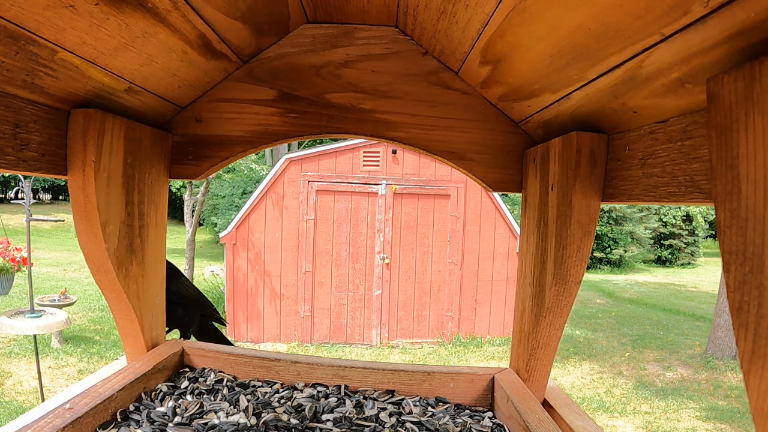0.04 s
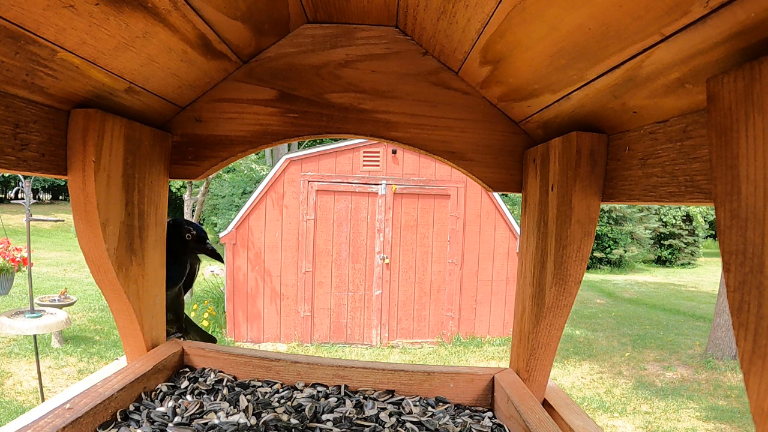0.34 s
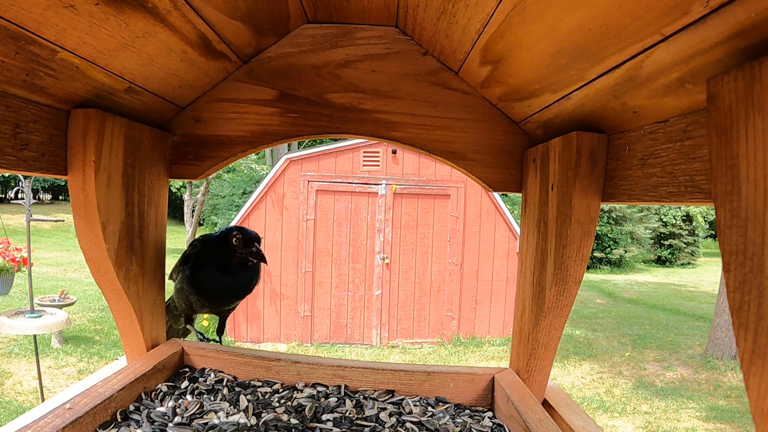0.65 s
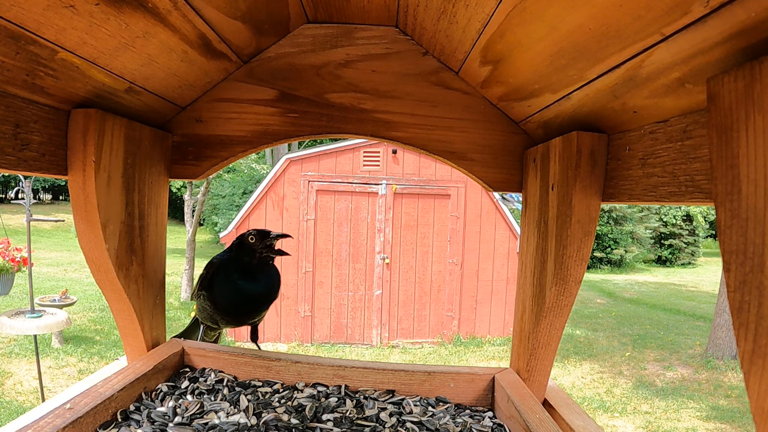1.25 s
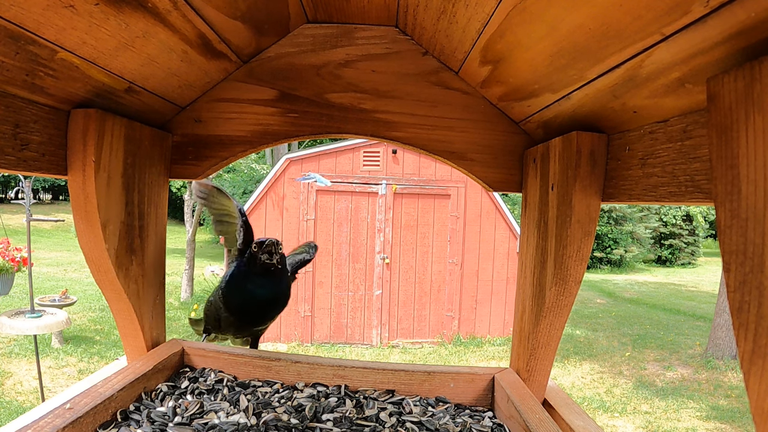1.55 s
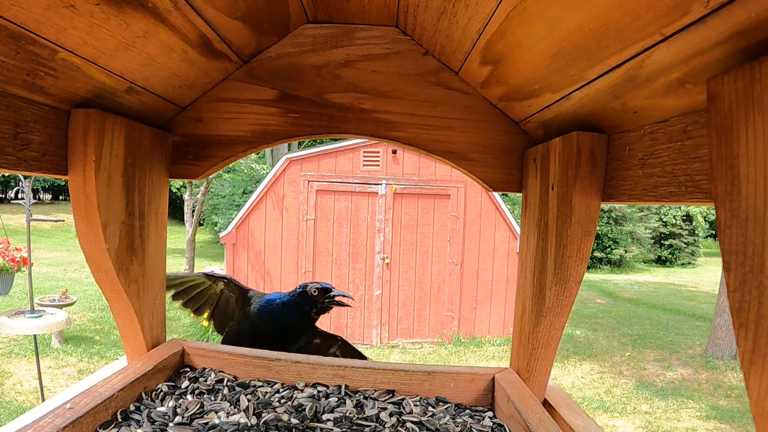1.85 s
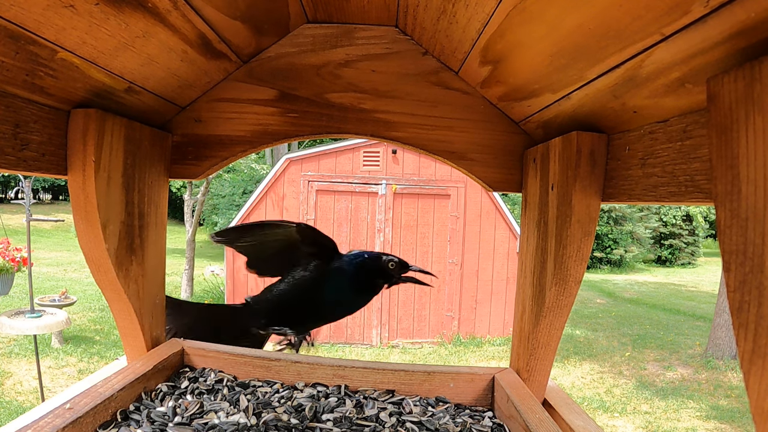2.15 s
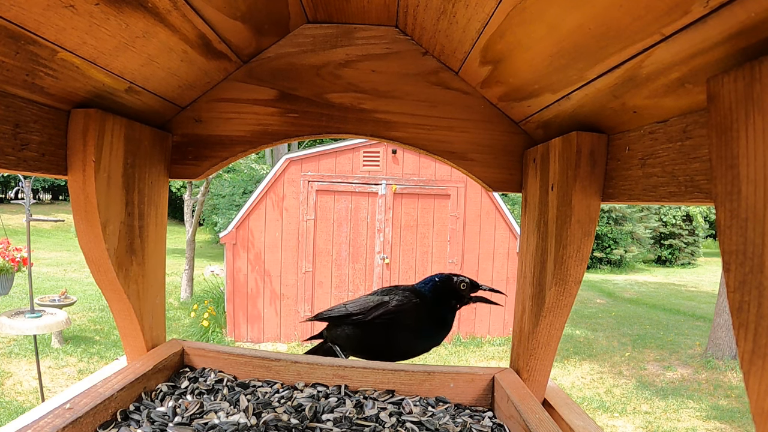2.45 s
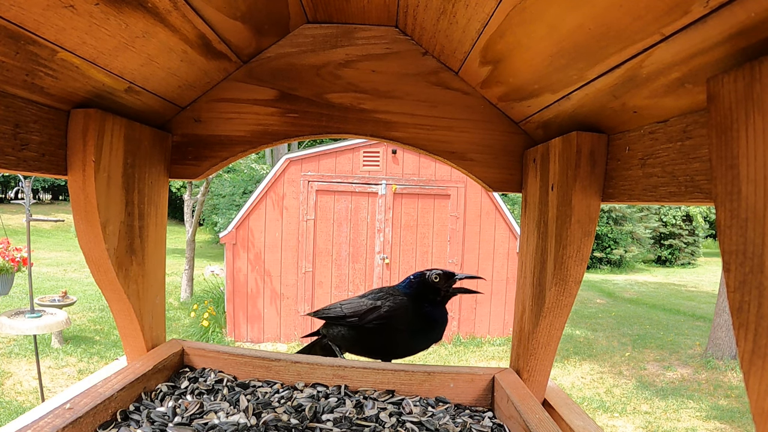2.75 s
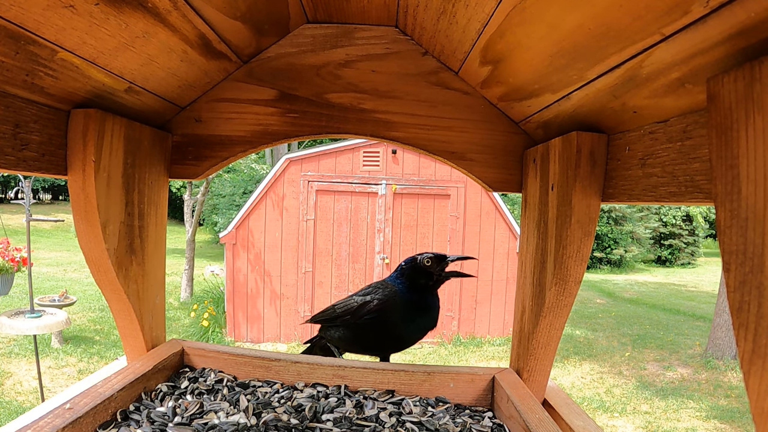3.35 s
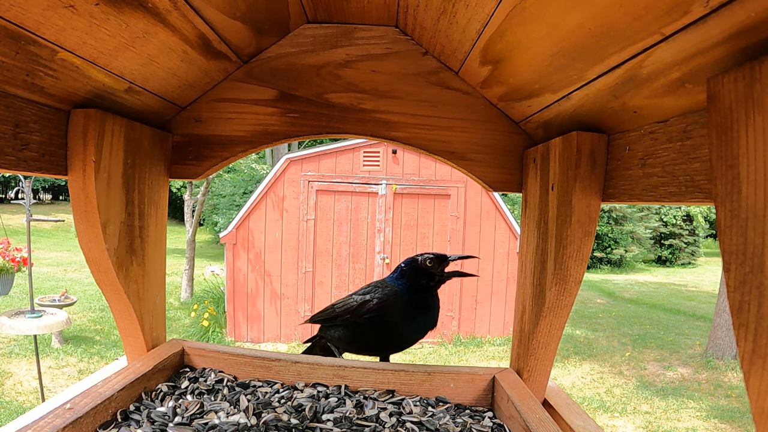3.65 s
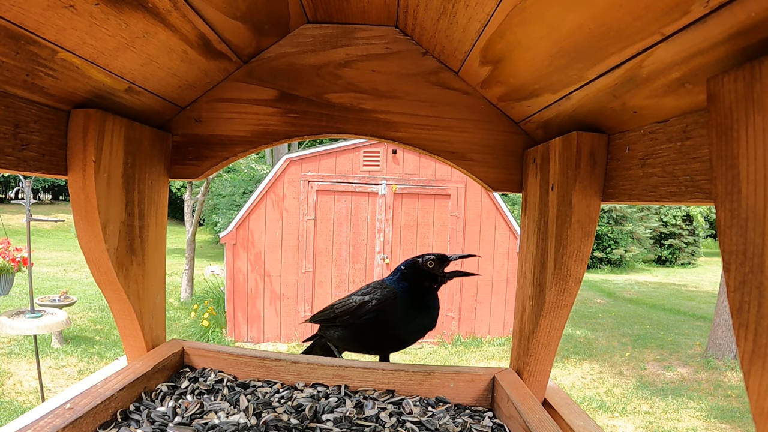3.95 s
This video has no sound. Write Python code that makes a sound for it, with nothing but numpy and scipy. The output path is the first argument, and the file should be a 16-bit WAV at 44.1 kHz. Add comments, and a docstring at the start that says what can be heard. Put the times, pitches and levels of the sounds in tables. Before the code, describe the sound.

Bird claws tap and scratch on wood close by, with rustling wings and faint wind.

```python
"""A bird hops along a small roofed wooden feeder, flaps across its rim and settles, close by.
Its claws catch and slip on the wood, so they tick and scratch while the boards knock and ring.
Its feathers rustle and swish over the wood, and moving air bumps the microphone.
Behind it a far engine drones, probably a mower, and other birds call faintly across the garden."""
import sys
import numpy as np
from scipy import signal
from scipy.fft import next_fast_len
from scipy.io import wavfile
from scipy.ndimage import uniform_filter1d

SR = 44100
rng = np.random.default_rng(int(sys.argv[2]) if len(sys.argv) > 2 else 0)


def transcribe(signal):
    """Save signal, clipped to [-1, 1], as a 16-bit WAV file at the path in sys.argv[1]."""
    frames = np.atleast_2d(signal).T
    limited = np.clip(frames, -1, 1)
    pcm = np.round(limited * 32767).astype(np.int16)
    wavfile.write(sys.argv[1], SR, pcm)


N = 176400
T = np.arange(N) / SR

# tone colours: how strong each frequency is (frequency [Hz], relative level [dB])
HUSH_COLOUR = [(20,-18),(200,10),(700,1),(1100,0.5),(2400,-6.5),(4800,-10.5),(7200,-17.5),(9000,-27),(12000,-36.5),(15500,-64)]  # outdoor air
RASP_COLOUR = [(5000,-35),(7500,0),(9500,-8),(13000,-9),(14500,-30)]  # a passing bird's rasp
WIND_COLOUR = [(10,1),(40,6),(90,-1),(140,-6.5),(210,-16.5),(320,-28.5),(700,-41.5),(2000,-86)]  # wind on the microphone
FEATHER_COLOUR = [(200,-16),(380,3),(600,3.5),(1200,0.5),(2700,-22.5),(5200,-23),(9000,-22.5),(13000,-34),(15500,-48)]  # feathers brushing wood
TICK_COLOUR = [(500,-24),(2000,-16),(3200,-2.5),(5200,-2.5),(7500,-5),(10000,-21),(12500,-19.5),(15500,-40)]  # a claw's bright tick
RAP_COLOUR = [(200,-33),(500,1),(1100,4.5),(1600,-1),(2200,-6.5),(2900,-12),(5000,-30),(16000,-57)]  # the duller rap on the rim

# the far engine's speed and loudness (time [s], firing rate [Hz], relative level [dB])
ENGINE_RUN = [(0,50.3,-36.5),(.8,49.96,-32.5),(1.15,49.26,-29),(1.42,46.28,-42.5),(1.7,47.47,-39),(2.05,50.2,-31),(2.5,50.74,-33.5),(2.75,51,-29.5),(3.05,53.1,-31.5),(3.4,53.9,-30.5),(4,52.57,-30.5)]
# the tones in its drone (multiple of the firing rate, relative level [dB])
ENGINE_TONES = [(1,-5.5),(2,-1.5),(3,-23)]
# far birds' whistles (time [s], relative level [dB])
WHISTLES = [(2.858,-60),(3.146,-60),(3.47,-57),(3.755,-57)]
# each whistle's steep drop and low tail (time into the note [s], pitch [Hz])
WHISTLE_PITCH = [(0,4800),(.046,3400),(.065,2350),(.125,2250)]
# a passing bird's call (time [s], length [s], relative level [dB], start pitch [Hz], end pitch [Hz])
PASSING_CALLS = [(1.064,.058,-49,6900,6350)]
# gusts on the microphone (time [s], relative level [dB])
GUSTS = [(0,-23.5),(.14,-43.5),(.45,-36.5),(.6,-24.5),(.74,-33),(.88,-27),(1.15,-35),(1.31,-26.5),(1.42,-38.5),(1.72,-39.5),(1.93,-31.5),(2.08,-35.5),(2.55,-33.5),(2.7,-44.5),(4,-54.5)]
# low bumps of air and the swaying feeder (time [s], relative level [dB], pitch [Hz], length [s])
BUMPS = [(.002,-24,96.7,0.042),(.555,-18,62.5,0.045),(.632,-21.5,92,0.058),(0.756,-25,66.6,0.047),(0.835,-18.5,69.6,0.05),(0.98,-14.5,140,0.01),(1.033,-15,71.4,0.032),(1.257,-18.5,102,0.02),(1.295,-24.5,129,.05),(2.519,-23,49,0.068)]
# the notes the boards ring at (pitch [Hz], relative level [dB], time for a knock to fade by 60 dB [s])
BOARD_NOTES = [(186.9,-5.5,0.3),(230.5,-15.5,0.37),(290,-10,0.61),(345,-0.5,0.23),(401,-0.5,0.14),(428,1,0.051),(533,-5,0.088),(575.6,-6.5,0.089),(678,-10.5,0.087),(1144,-17.5,0.13)]
# the sharp, high notes of claw on wood (pitch [Hz], relative level [dB])
TICK_NOTES = [(2150,3.5),(2440,-3.5),(3280,-1),(3970,-8.5),(4680,2),(5070,-5),(6520,-8.5),(7670,-9.5),(9260,-3.5)]
# the rustle of wings and body (time [s], relative level [dB])
RUSTLE = [(0,-63),(.45,-54.5),(.55,-47),(.65,-47.5),(.76,-59),(.94,-39),(.97,-45),(1.08,-53),(1.6,-58.5),(1.78,-45),(1.88,-42.5),(1.98,-38.5),(2.14,-51),(2.2,-46),(2.27,-44.5),(2.34,-38.5),(2.5,-45),(2.62,-52),(2.8,-81)]
# wing and tail feathers sweeping along the wood (time [s], length [s], relative level [dB])
SWEEPS = [(1.857,0.043,-47),(1.947,0.038,-42.5),(2.037,0.041,-49),(2.166,0.066,-57),(2.295,0.027,-50),(2.348,0.034,-53),(2.405,0.081,-49.5)]
# light taps of a claw tip (time [s], relative level [dB])
TAPS = [(.598,-50),(.885,-45),(1.035,-42),(1.635,-43.5),(1.709,-41),(1.889,-42),(2.514,-46),(2.5255,-46),(2.5437,-44)]
# claws landing on wood, with relative levels
# (time [s], rap [dB], knock [dB], tick [dB], rap pitch [Hz], scratch fade time [s])
CLAW_HITS = [(0.114,-38,-39,-51,1320,0.014),(0.528,-35.5,-47,-62,1860,0.014),(0.557,-24.5,-33,-37.5,1503,0.008),(.674,-37.5,-30.5,-44.5,760,0.0073),(0.7,-38,-35.5,-45.5,1040,0.0028),(0.7968,-35,-42,-43.5,2000,0.0052),(.811,-34,-38,-42,1940,0.0055),(0.9984,-37.5,-30.5,-37.5,1350,0.006),(1.7421,-36,-40.5,-33.5,3100,0.0018),(1.812,-36.5,-42,-32,2120,0.004),(1.8216,-34.5,-33,-35,2070,0.00096),(1.8542,-40,-28.5,-37,2230,0.0022),(1.868,-34.5,-32.5,-35.5,1590,0.0059),(1.8772,-37,-29,-28,2420,0.0033),(1.9184,-39.5,-31.5,-38,1530,0.002),(1.943,-28,-26,-37.5,1315,0.0065),(2.0130,-30,-36,-40,1930,0.0013),(2.1067,-37.5,-30,-45.5,717,0.0035),(2.1761,-37,-33,-43,1105,0.0048),(2.2405,-44,-37.5,-47.5,1140,0.0037),(2.3288,-31.5,-29,-44,1450,0.0069),(2.366,-36.5,-45,-38.5,1580,0.0048),(2.4286,-37,-31,-35,1270,0.0019),(2.4379,-34.5,-30,-42,2110,0.0047),(2.4488,-27.5,-25.5,-25.5,2174,0.0031),(2.651,-33,-36.5,-44,2083,0.0034)]

RAP_DB, KNOCK_DB, TICK_DB = -2.5, -2, -2.5  # added to the levels in CLAW_HITS
CLEAN_SCRATCH_S = 0.005  # longer scratches lose their clean ring
RIM_T60, ROOF_T60, GARDEN_T60 = 0.024, 0.059, 0.6  # a T60 is the seconds taken to fade by 60 dB


def amp(db):
    """Turns decibels into a number to multiply a sound by."""
    return 10 ** (np.asarray(db) / 20)


def unit(x):
    """Scales a sound to an average power of 1."""
    return x / np.sqrt(np.mean(x ** 2) + 1e-20)


def unit_peak(x, size):
    """Scales a sound so its loudest stretch of `size` samples has an average power of 1."""
    return x / np.sqrt(uniform_filter1d(x ** 2, size).max() + 1e-20)


def curve(rows, column=1):
    """Joins a table's points with straight lines, giving a value for every sample."""
    rows = np.array(rows)
    return np.interp(T, rows[:, 0], rows[:, column])


def add(mix, start, sound):
    """Mixes a sound in at `start` seconds."""
    part = mix[max(round(start * SR), 0):][:len(sound)]
    part += sound[:len(part)]


def colour(x, points):
    """Gives a sound a tone colour, with no ringing before the sound starts."""
    size = next_fast_len(len(x) + 4096)
    hz, db = np.transpose(points)
    log_hz = np.log(abs(np.fft.fftfreq(size, 1 / SR)) + 1)
    log_gain = np.log(amp(np.interp(log_hz, np.log(hz), db)))
    response = np.exp(np.conj(signal.hilbert(log_gain)))
    return np.fft.ifft(np.fft.fft(x, size) * response).real[:len(x)]


def resonate(x, hz, width_hz):
    """Makes a sound ring at one pitch; a narrower width rings longer."""
    fade = np.exp(-np.pi * abs(width_hz) / SR)
    return 2 * signal.lfilter([1 - fade], [1, -fade * np.exp(2j * np.pi * hz / SR)], x).real


def drift(rate, size=N):
    """Glides to a new random value `rate` times a second."""
    targets = rng.standard_normal(size // 8 + 2)
    return np.interp(np.arange(size) * rate / SR, np.arange(len(targets)), targets)


def stereo(shared, side, side_db, left_db):
    """Adds `side` on the left and subtracts it on the right; `left_db` tips the balance left."""
    side = amp(side_db) * side
    return np.array([(shared + side) * amp(left_db / 2), (shared - side) * amp(-left_db / 2)])


def noise(points):
    """Steady noise with a given tone colour."""
    return unit(colour(rng.standard_normal(N), points))


def echoes(x, t60):
    """A dying cloud of reflections, different at each ear."""
    t = T[:SR // 2]
    tail = rng.standard_normal((2, len(t))) * amp(-60 * t / t60) * (t > .001)
    return signal.fftconvolve(x[None], tail / np.linalg.norm(tail[0]), axes=1)[:, :N]


def garden():
    """The steady hush of outdoor air."""
    hush = stereo(noise(HUSH_COLOUR), noise(HUSH_COLOUR), side_db=-6, left_db=1)
    return hush * amp(-55.5 + .5 * drift(3.5))


def engine():
    """The low, slightly wavering drone of a far engine whose speed sags and recovers."""
    firings = np.cumsum(curve(ENGINE_RUN) * (1 + 0.0032 * drift(9.77))) / SR
    drone = sum(amp(db + .7 * drift(3.3)) * np.sin(2 * np.pi * (multiple * firings + rng.random()))
                for multiple, db in ENGINE_TONES)
    drone = np.sqrt(2) * drone * amp(curve(ENGINE_RUN, column=2))
    return drone * amp([[.3], [-.3]])  # a little to the left


def far_birds():
    """Falling whistles, blurred by the garden's echoes."""
    song, length = np.zeros(N), WHISTLE_PITCH[-1][0]
    tone = np.sin(2 * np.pi * np.cumsum(curve(WHISTLE_PITCH)) / SR)
    note = (np.sin(np.pi * T / length) * tone)[T < length]
    for start, db in WHISTLES:
        add(song, start, amp(db) * note)
    return .6 * song + echoes(song, GARDEN_T60)


def passing_bird(buzz_hz=800):
    """A thin, falling note that turns into a buzzing rasp and echoes in the garden."""
    call = np.zeros(N)
    for start, length, db, start_hz, end_hz in PASSING_CALLS:
        progress = np.arange(0, 1, 1 / (length * SR))
        pitch = start_hz + (end_hz - start_hz) * progress
        tone = np.sin(2 * np.pi * np.cumsum(pitch) / SR) * amp(-7 * progress)
        puffs = rng.standard_normal(len(progress)) * (1 + np.cos(2 * np.pi * buzz_hz * length * progress))
        rasp = unit(colour(puffs, RASP_COLOUR)) * np.sin(np.pi * progress ** 2.2) ** 2  # swells late
        swell = np.sqrt(np.sin(np.pi * progress))
        add(call, start, amp(db) * swell * (tone + amp(-4) * rasp))
    return call + echoes(call, t60=.2)


def wind():
    """Gusts rumble on the microphone, with soft, low bumps of air and the swaying feeder."""
    bumps = np.zeros(N)
    for start, db, hz, length in BUMPS:
        t = np.arange(0, length, 1 / SR)
        swell = np.sin(np.pi * t / length)
        add(bumps, start, amp(db) * swell * np.sin(2 * np.pi * hz * (t - length / 2)))
    level = amp(curve(GUSTS) + 1.2 * drift(25.08) + 0.5)
    return stereo(bumps + level * noise(WIND_COLOUR), level * noise(WIND_COLOUR), side_db=-13, left_db=-6)


def ticking(force, width_hz=220):
    """The bright sound of something small and hard on wood; each spot rings a little differently."""
    ring = np.zeros(len(force))
    for hz, db in TICK_NOTES:
        hz = hz * (1 + .045 * rng.standard_normal())
        db = db + 4 * rng.standard_normal()
        ring += amp(db) * resonate(resonate(force, hz, width_hz), hz, 10 * width_hz)
    return unit(colour(force, TICK_COLOUR)) + unit(ring)


def feather_rustle(crackles_per_s=900):
    """Feathers brush the wood in uneven strokes that stir the boards, with a fine crackle of ticking seeds."""
    force = rng.standard_normal(N) * amp(3 * drift(70) + 3.6 * drift(1800))  # strokes and finer grain
    brush = unit(colour(force, FEATHER_COLOUR))
    boards = sum(amp(db) * resonate(force, hz, 0.84 / t60) for hz, db, t60 in BOARD_NOTES)
    crackle = ticking(rng.standard_normal(N) * (rng.random(N) < crackles_per_s / SR))
    return (brush + amp(-0.5) * unit(boards) + amp(-15) * unit(crackle)) * amp(curve(RUSTLE) - 7.5)


def feather_sweeps():
    """Stiff feathers drag over the wood: a grainy swish that swells and fades."""
    out = np.zeros(N)
    for start, length, db in SWEEPS:
        progress = np.arange(0, 1, 1 / (length * SR))
        grains = rng.standard_normal(len(progress)) * amp(3 * drift(885, len(progress)))
        swish = unit(colour(grains, TICK_COLOUR)) + 0.56 * unit(colour(grains, RAP_COLOUR))
        add(out, start, amp(db) * np.sin(np.pi * progress) * swish)
    return out


def scratch(t, fade_s):
    """A claw catches and slips: a short, grainy burst of force. Long scratches start softly."""
    grains = rng.standard_normal(len(t)) * amp(0.5 * drift(1552, len(t)))
    age = t / fade_s
    rise = np.minimum(age / 0.64, 1) ** 2
    return grains * rise * np.exp(-age)


def claw_taps():
    """Claw tips touch down too lightly to stir the boards."""
    out, t = np.zeros(N), T[:SR // 10]
    for start, db in TAPS:
        force = scratch(t, fade_s=0.0021)
        tap = ticking(force) + 1.03 * unit(colour(force, RAP_COLOUR))
        add(out, start, amp(db) * unit_peak(tap, 180))
    return out


def rim_rap(t, hz, fade_s):
    """A claw scrapes the rim and makes it ring; long scratches give a rougher, weaker note."""
    scrape = colour(scratch(t, fade_s), RAP_COLOUR)
    scrape = scrape + echoes(scrape, t60=0.058)[0, :len(t)]
    phase = 2 * np.pi * (hz * t + rng.random())
    roughness = (fade_s / CLEAN_SCRATCH_S) ** 2 / 2 * drift(465, len(t))
    ring = np.sin(phase + roughness) * amp(-60 * t / RIM_T60) * (1 - np.exp(-t / fade_s))
    return unit(scrape) + 0.86 * min(CLEAN_SCRATCH_S / fade_s, 1) * unit(ring)


def board_knock(t, rise_s=0.0043):
    """The struck boards ring with several fading notes, in a different blend each time."""
    ring = np.zeros(len(t))
    for hz, db, t60 in BOARD_NOTES:
        level = amp(db + 2.94 * rng.standard_normal() - 60 * t / t60)
        ring += level * np.sin(2 * np.pi * (hz * t + rng.random()))
    return ring * (1 - np.exp(-t / rise_s))


def claw_hits():
    """Each landing claw makes a bright tick, a rap on the rim and a slower knock of the boards."""
    out, t = np.zeros(N), T[:SR // 3]
    for start, rap_db, knock_db, tick_db, hz, fade_s in CLAW_HITS:
        tick = amp(tick_db + TICK_DB) * unit_peak(ticking(scratch(t, fade_s)), 180)
        rap = amp(rap_db + RAP_DB) * unit_peak(rim_rap(t, hz, fade_s), 180)
        knock = amp(knock_db + KNOCK_DB) * unit_peak(board_knock(t), 600)
        add(out, start, tick + rap + knock)
    return out


def scene():
    """The bird in the garden feeder, whose roof echoes and whose walls reflect differently each side."""
    bird = claw_hits() + claw_taps() + feather_rustle() + feather_sweeps()
    walls = echoes(colour(bird, [(800, -13.5), (3000, 1)]), t60=0.023)[0]  # mostly the highs bounce back
    roof = amp(ROOF_DB := -7) * echoes(bird, ROOF_T60)
    feeder = stereo(bird, walls, side_db=-12, left_db=0.5) + roof
    return feeder + wind() + engine() + garden() + far_birds() + passing_bird()


def record(dry):
    """Cuts away the very highest treble, above 15600 Hz."""
    treble_cut = signal.firwin(511, 15600, window=("kaiser", 9), fs=SR)
    return signal.oaconvolve(dry, treble_cut[None], "same")


dry = scene()
out = record(dry)
transcribe(out)
```